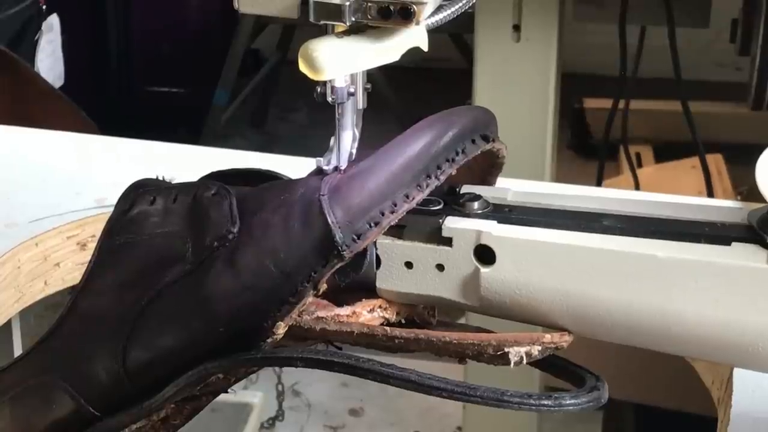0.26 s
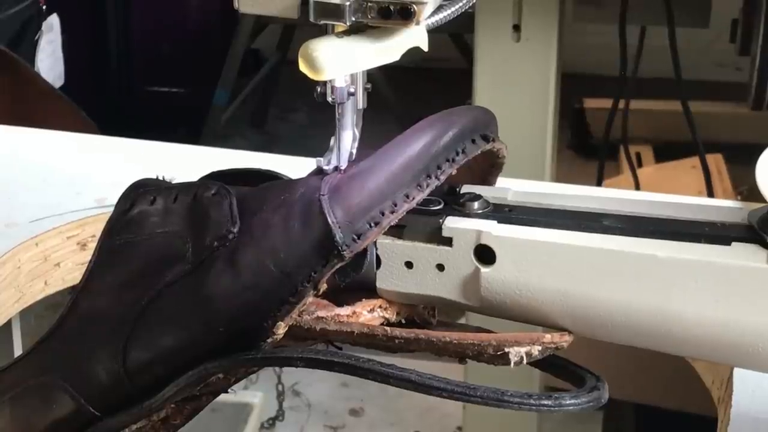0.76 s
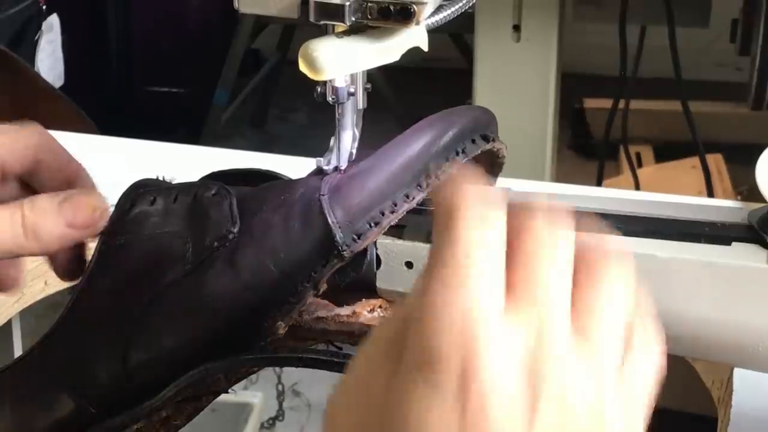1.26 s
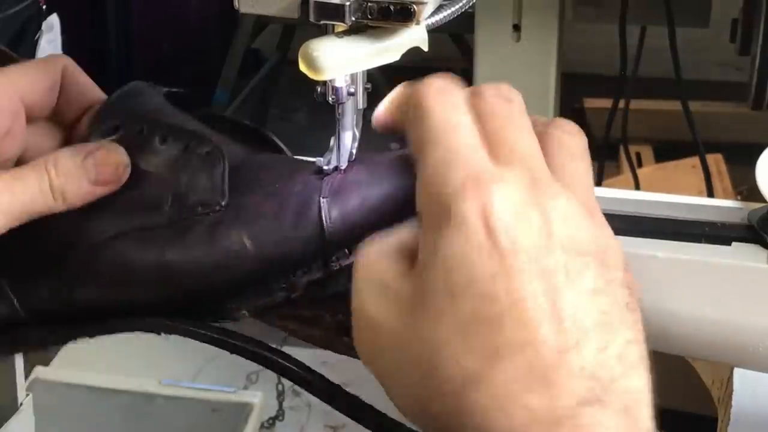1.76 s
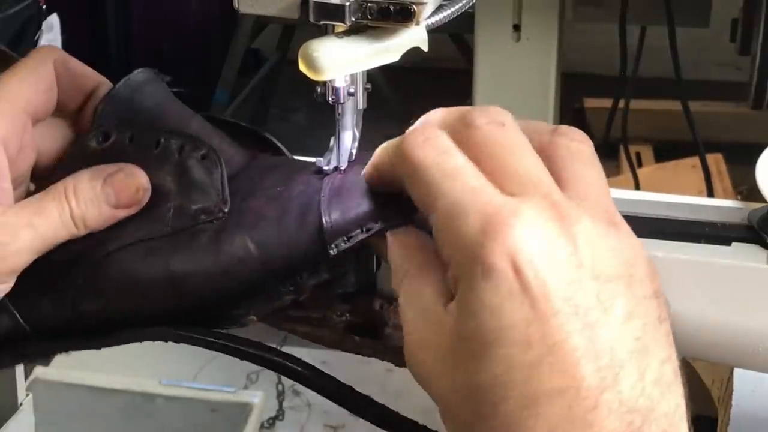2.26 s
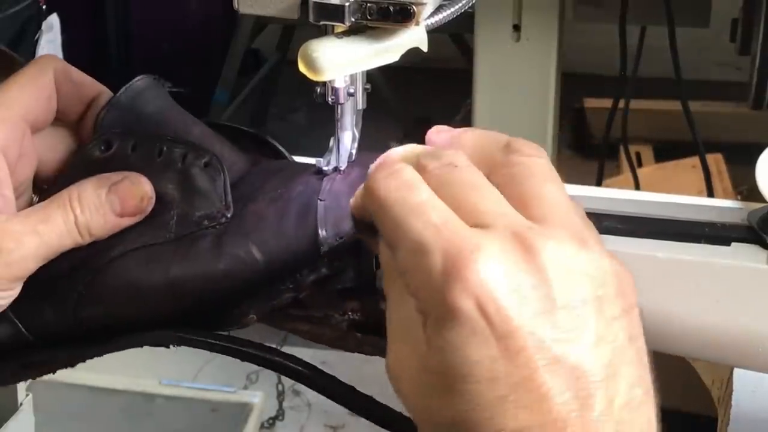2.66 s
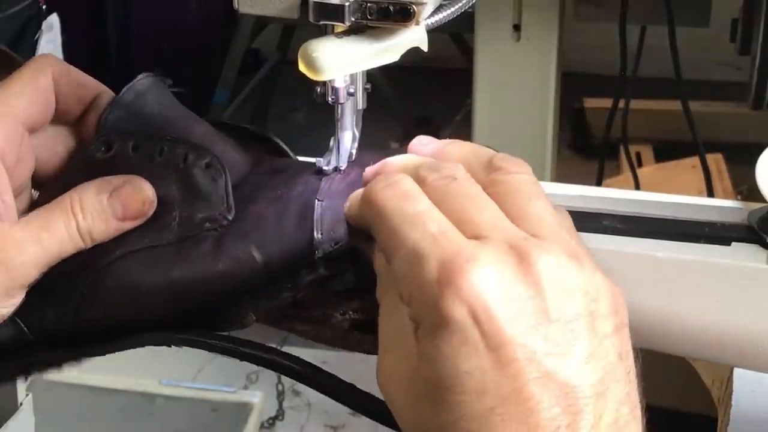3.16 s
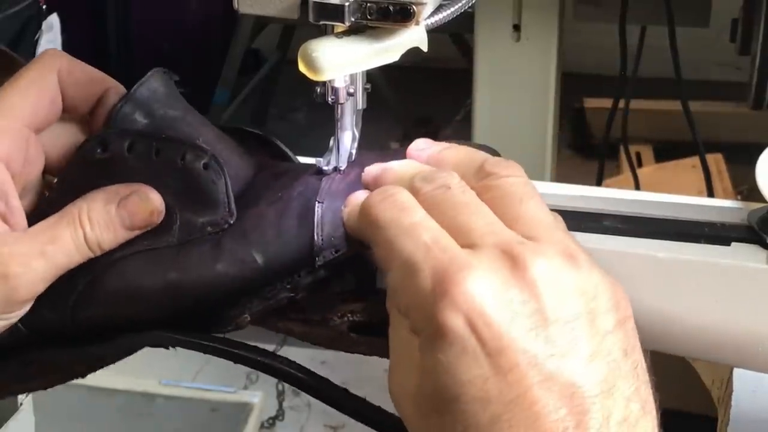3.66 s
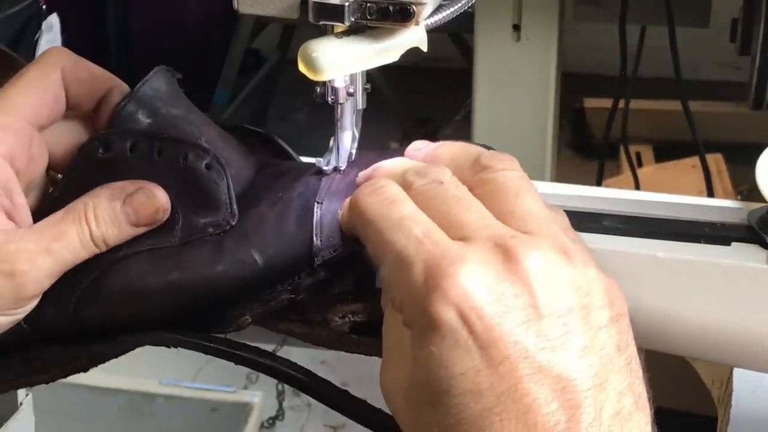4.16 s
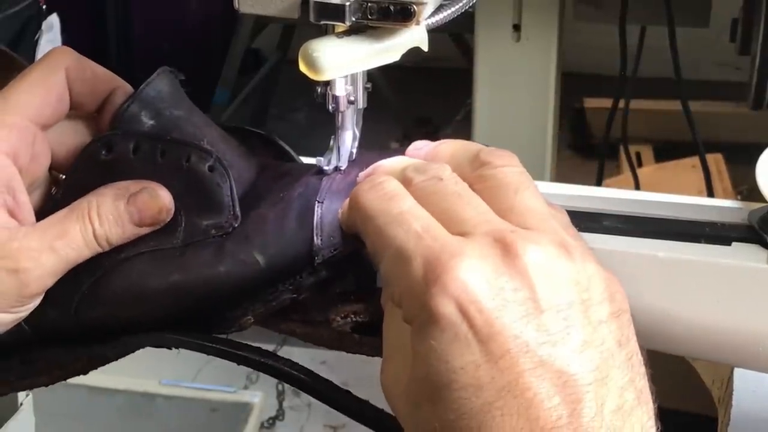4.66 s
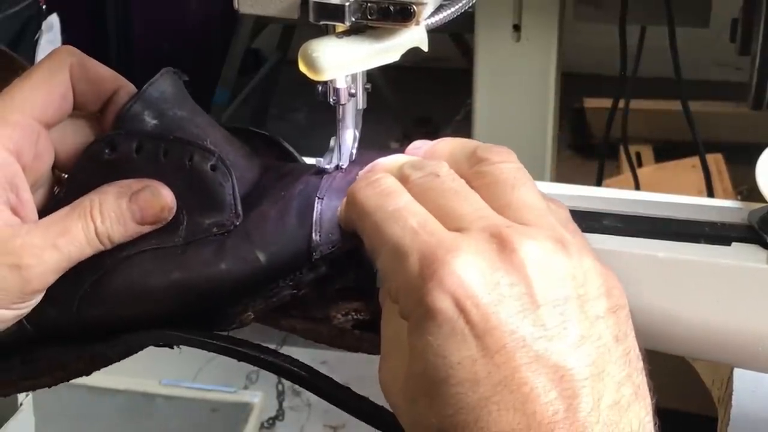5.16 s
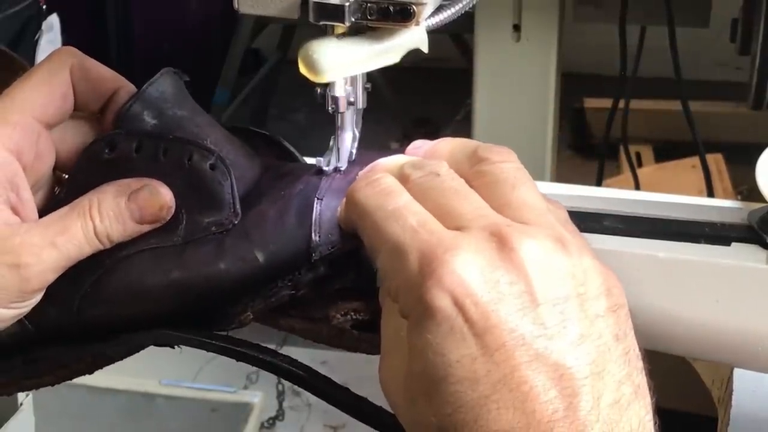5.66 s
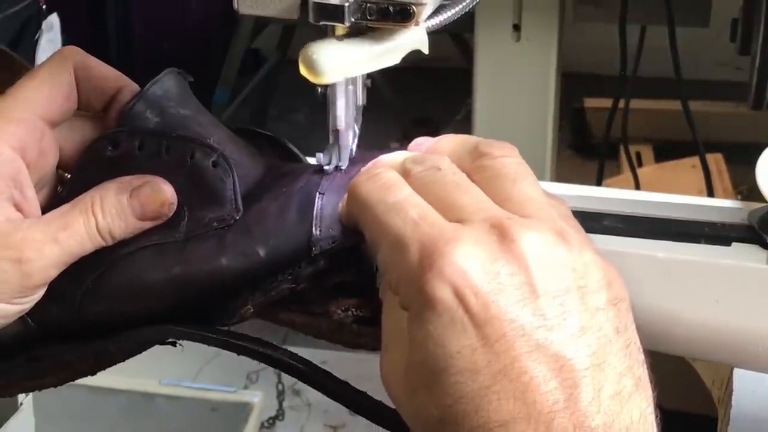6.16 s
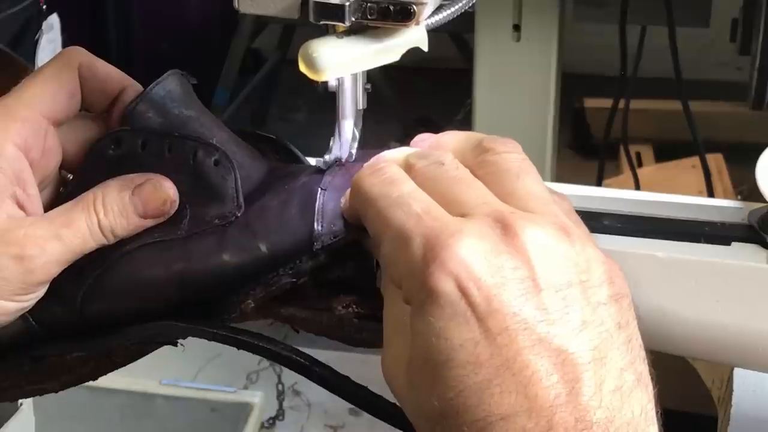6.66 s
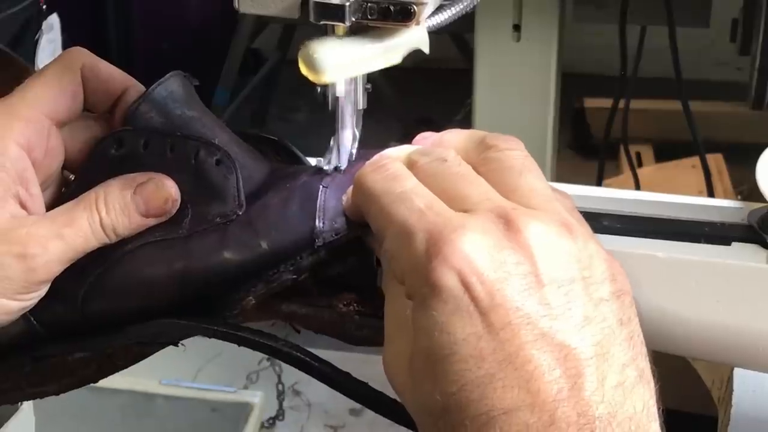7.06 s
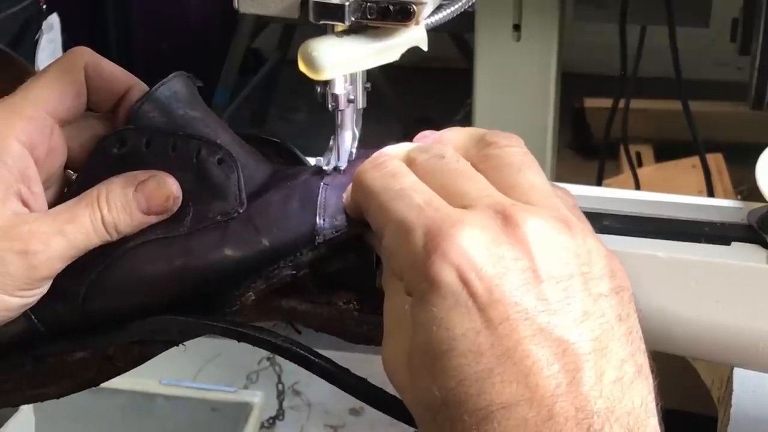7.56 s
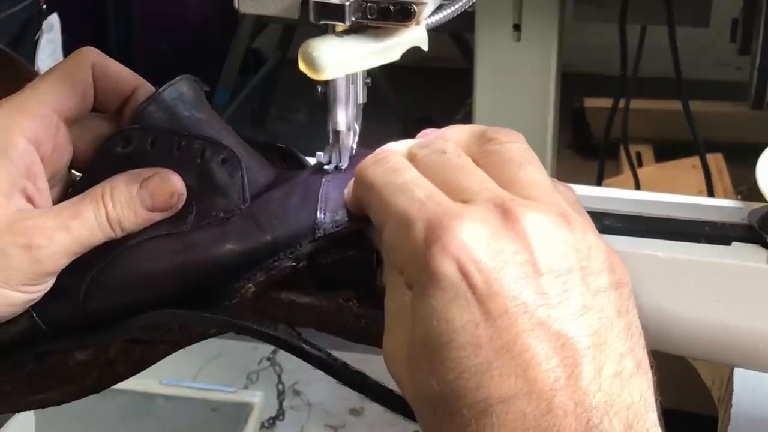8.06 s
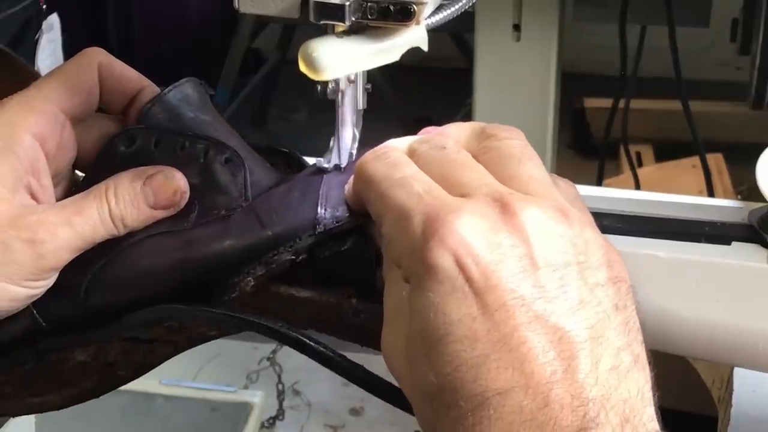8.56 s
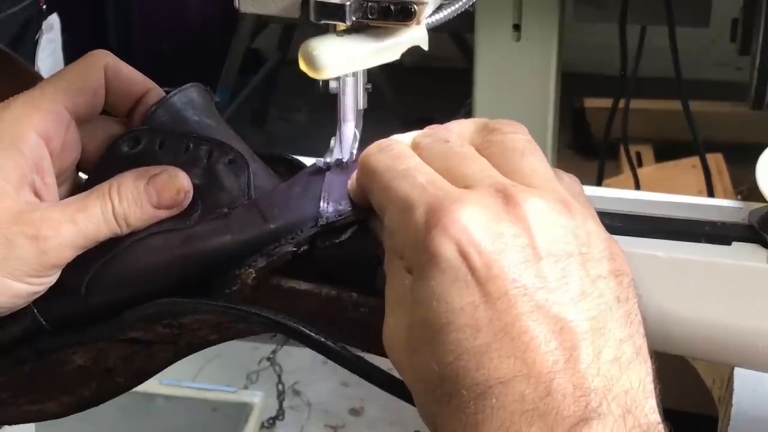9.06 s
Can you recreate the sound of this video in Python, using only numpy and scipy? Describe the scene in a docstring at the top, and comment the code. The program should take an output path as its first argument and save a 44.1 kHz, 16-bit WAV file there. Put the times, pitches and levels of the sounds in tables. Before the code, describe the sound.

Close in a small, fairly dry workshop, a motor hums quietly. A heavy thud on a wooden table opens, followed by leather rustle and a sharp metal snap. Boot and hands knock the steel bed, then settle with small taps and faint pedal sounds. A first stitch clacks, then steady rattling strokes run to the end, with thin high squeals and brief creaks.

```python
"""In a small workshop a clutch motor idles under a leather sewing machine while hands settle a boot on its arm.
Impacts are noise bursts with damped rings: boot, hands and pedal knock, the presser foot drops, then cams, needle
bar and shuttle clack. The slipping clutch squeals on two beating tones, tight thread creaks through the modes of
the iron arm, and the turning shaft rattles as dense ticks while the table drums. Leather rustles as shaped noise,
the motor hums as wavering sines, and sparse reflections answer the impacts, creaks and squeals."""
import sys
import numpy as np
from scipy import signal
from scipy.fft import rfft, irfft
from scipy.io import wavfile
from scipy.ndimage import uniform_filter1d

SR = 44100
rng = np.random.default_rng(int(sys.argv[2]) if len(sys.argv) > 2 else 0)


def unload_wav(signal):
    """Save mono or channel-first audio to the path in sys.argv[1] as 16-bit WAV at rate SR, clipped to [-1, 1]."""
    wavfile.write(
        sys.argv[1],
        SR,
        np.round(np.clip(np.atleast_2d(signal).T, -1, 1) * 32767).astype(np.int16),
    )


N = 410130  # samples

# Levels in the tables are relative where a function or the mix applies a further gain.
# Air of the room. Each row: frequency in Hz, relative spectrum level in dB per Hz.
AIR_SPECTRUM = [(24, -23), (40, 0), (71, -4.5), (207, -16.5), (273, -14), (461, -25.5), (1050, -29),
                (1350, -27.5), (1640, -31), (3740, -38), (4800, -40), (8730, -42), (10400, -48),
                (12700, -42), (15500, -50)]
AIR_DB = -60
# Hum lines of the idling motor. Each row: frequency in Hz, level in dB.
MOTOR_LINES = [(59.2, -57.5), (118.4, -68), (258.4, -77.5), (527.6, -88.5)]
DRONE_HZ, DRONE_DB, DRONE_DRIFT_HZ = 47.6, -65.5, 3  # a low wavering drone; rms drift
# Sleeves and hands sliding over leather. Each row: time in seconds, rustle level in dB, fine hiss level in dB.
RUBBING = [(0, -71.5, -82), (.2, -70, -74), (.375, -69.5, -79), (.4, -64, -75), (.48, -62.5, -70),
           (.57, -67, -73.5), (.63, -72.5, -81.5), (.9, -71, -81), (1.18, -63, -76.5), (1.55, -66.5, -82),
           (1.63, -74, -75.5), (1.8, -74.5, -83), (1.9, -65, -73), (2.1, -64.5, -72), (2.42, -73, -83),
           (3.2, -97, -100)]
# Rustle of leather. Each row: frequency in Hz, relative spectrum level in dB per Hz.
RUSTLE_SPECTRUM = [(710, -1.5), (1200, -3.5), (1750, -3.5), (2130, -3.5), (2680, -2), (3290, -4.5),
                   (4640, -1.5), (8500, -8.5), (11000, -24), (18700, -120)]
# Fine hiss of leather. Each row: frequency in Hz, relative spectrum level in dB per Hz.
HISS_SPECTRUM = [(4410, -34), (7500, -47), (9290, -11.5), (10500, -19.5), (12500, -9.5), (13700, -18),
                 (15100, -12), (15600, -36.5)]

# Dragging of the boot or pedal chain. Each row: top in seconds, hold in seconds, level in dB.
DRAGS = [(3.754, 0.084, -55), (4.263, 0.052, -62)]
# Scrape of the drag. Each row: frequency in Hz, relative spectrum level in dB per Hz.
DRAG_SPECTRUM = [(300, -17), (450, 0), (900, 1.5), (1500, -0.5), (2500, 2), (3900, -6.5), (4600, -27),
                 (9000, -54)]
CATCH, LET_GO = 4500, 280  # rise and fall of a drag, dB per s

# Two contacts of a heavy thud on the wooden table.
# Each row: start in seconds, level in dB, share of the free ring time.
THUDS = [(.1165, -34.5, 0.97), (.1235, -24, 0.46)]
# Modes of the table. Each row: frequency in Hz, relative level in dB, free t60 in seconds.
TABLE_MODES = [(196, -11, 0.22), (274, 11.5, 0.03), (397, 0.5, 0.049), (577, 5.5, 0.032), (860, -20, 0.034)]
# Pressing the pedal sets its rod humming. Each row: start in seconds, level in dB, share of the free ring time.
PEDAL_PRESSES = [(4.104, -54.5, 0.6), (4.268, -50.5, 1), (4.487, -53.5, 0.87), (5.031, -56.5, 0.97),
                 (5.397, -53, 0.73), (7.619, -52.5, 0.47)]
# Modes of the pedal rod. Each row: frequency in Hz, relative level in dB, free t60 in seconds.
ROD_MODES = [(420, -12, 0.51), (534, -3, 0.69)]
# The boot knocks the steel bed. Each row: start in seconds, level in dB, share of the free ring time.
BED_HITS = [(1.1123, -47, 0.8), (1.156, -45.5, 0.63), (1.846, -41.5, 1), (1.8846, -53, 1),
            (1.9599, -44, 0.68), (1.9959, -51, 0.62), (2.0682, -59, 0.71)]
# Modes of the steel bed. Each row: frequency in Hz, relative level in dB, free t60 in seconds.
BED_MODES = [(920, -6, 0.15), (1420, -5.5, 0.49), (1460, -9, 0.22), (1700, -6.5, 0.19), (2310, -18, 0.097),
             (2480, -9, 0.075), (3460, -16, 0.19)]
# A small loose steel part is jolted. Each row: start in seconds, level in dB, share of the free ring time.
PINGS = [(0.126, -50, 0.42), (1.8464, -52, 0.17), (1.9612, -51, 0.15), (4.74, -61, 0.4), (8.6832, -55, 0.4)]
# Modes of that loose part. Each row: frequency in Hz, relative level in dB, free t60 in seconds.
PIN_MODES = [(5600, -2, 0.67), (5720, -4, 0.27), (6130, -5, 0.41)]
# Knocks of boot, hands and pedal. Each row: start in seconds, level in dB, thump in dB relative to it,
# tick in dB relative to it, main ring in Hz, t60 in seconds.
KNOCKS = [(0.0662, -49.5, -3, -16, 1370, 0.056), (0.1182, -26.5, -3, -2, 1664, 0.05),
          (0.392, -52.5, -15, 5, 1520, 0.052), (0.6784, -53.5, -16, -12, 1050, 0.051),
          (1.0005, -38, -35, -18, 1181, 0.27), (1.1095, -49, 7.5, -16, 1610, 0.23),
          (1.1551, -47.5, 6, -22, 940, 0.17), (1.4679, -50.5, 2.5, 5, 920, 0.13),
          (1.4922, -37, -6.5, -7, 1150, 0.12), (1.8469, -45.5, 4.5, -15, 1350, 0.2),
          (1.96, -43.5, 2, -6, 933, 0.21), (1.9976, -52.5, 3.5, -49, 1334, 0.49),
          (2.0681, -37.5, -13, -7, 950, 0.055), (2.15, -39, -9, -11, 1233, 0.12),
          (2.4315, -49.5, -20, -10, 1690, 0.08), (2.6628, -43.5, -22, -13, 2396, 0.16),
          (2.664, -46.5, -13, -19, 815, 0.084), (2.699, -48, -26, -22, 2450, 0.096),
          (2.704, -50.5, -20, -24, 1215, 0.16), (3.2173, -43, -9, -7, 2230, 0.14),
          (3.4826, -60.5, -21, 3, 1240, 0.16), (3.757, -48, -16, -9, 2550, 0.18),
          (4.1036, -47.5, -25, -7, 1142, 0.11), (4.2687, -54.5, 5, -28, 1415, 0.27),
          (4.487, -61.5, 5.5, -20, 1500, 0.22), (5.1434, -50.5, 5.5, -21, 1495, 0.072),
          (5.3983, -54.5, -10, 0, 926, 0.13), (5.4767, -51, -1, -17, 1450, 0.1),
          (7.6183, -46.5, -5, -12, 940, 0.079)]

# Surges of the shaft. Each row: top in seconds, hold in seconds, gear rattle level in dB,
# table drumming in dB relative to the rattle.
SURGES = [(4.114, .01, -57.5, 4.5), (4.313, 0.18, -67, 8), (4.717, .02, -53, 0), (4.971, 0.06, -48, 5),
          (5.352, 0.061, -58, 1), (5.676, .01, -40.5, -2.5), (5.927, 0.011, -39.5, 1),
          (6.192, .05, -42.5, 0.5), (6.393, 0.035, -61.5, -6), (6.493, 0.057, -44.5, 3.5),
          (6.774, 0.0052, -40, 0.5), (7.053, 0.056, -43, 2), (7.297, .13, -46, 2.5), (7.612, .03, -61.5, 5),
          (7.811, .15, -44.5, 2), (8.102, 0.086, -51.5, 5.5), (8.402, 0.066, -43, 4),
          (8.723, 0.089, -46.5, 2.5), (9.03, 0.025, -42, -1.5), (9.265, .03, -57, -2)]
SPIN_UP, RUN_DOWN = 406, 175  # rise and fall of the rattle, dB per s
DRUM_LAG_S, DRUM_UP, DRUM_DOWN = 0.015, 370, 151  # the table follows late: s, dB per s, dB per s
# Rattle of teeth and links. Each row: frequency in Hz, relative spectrum level in dB per Hz.
RATTLE_SPECTRUM = [(350, -16), (600, 11), (844, -15), (1060, 4), (1340, 7), (3480, 2), (5030, -2),
                   (8110, -9.5), (10100, -17), (12700, -8), (15600, -49)]
# Drumming of the table. Each row: frequency in Hz, relative spectrum level in dB per Hz.
DRUMMING_SPECTRUM = [(76, -42), (130, -6.5), (205, -6), (237, 1), (346, -3.5), (424, 4), (837, -22),
                     (900, -5.5), (1170, 0), (1980, -120)]
# Resonances of the stand under the table. Each row: frequency in Hz, width in Hz, relative level in dB.
STAND_MODES = [(182, 16.4, 10), (254, 32, -3.5), (298, 57, 2.5), (417, 32, -5), (528.5, 16, 2.5),
               (608, 180, -5)]

# Creaks as the thread pulls tight. Each row: start in seconds, level in dB, time to half the climb in seconds.
CREAKS = [(5.919, -45.5, .022), (6.163, -42, 0.026), (7.805, -39, 0.027), (8.375, -44, .014),
          (8.993, -40.5, 0.034)]
CREAK_S, CREAK_HZ, CREAK_HOLD_S, CREAK_FADE = 0.085, (1110, 3060), 0.027, 830  # last: dB per s
CREAK_TONE = 1.04  # amplitude of the gliding tone; the rasp noise beside it is evened to rms 1
# Resonances of the iron arm. Each row: frequency in Hz, width in Hz, relative level in dB.
ARM_MODES = [(1090, 22, 9), (1222, 19, 0), (1838, 49, 1), (2384, 24, 10), (2926, 44, 11), (3270, 48, -10)]

# Squeals of the slipping clutch. Each row: top in seconds, hold in seconds, level in dB,
# pitch in Hz above the usual, upper tone in dB relative to the level.
SQUEALS = [(4.417, 0.032, -59.5, 20, 5), (4.64, .016, -43, -150, -23), (4.916, 0.0074, -51.5, 7, 6),
           (5.304, 0.035, -53, 5, -6), (5.579, 0.016, -55, 40, -10), (5.848, 0.055, -57, 12, -6),
           (6.137, .006, -43, -53, -20), (6.422, 0.019, -48, -3, -12), (6.718, .004, -59, -20, -20),
           (6.998, 0.021, -50, -18, -20), (7.262, .018, -50.5, -16, -20), (7.778, .004, -45, -70, -22),
           (8.337, .02, -48.5, -42, -20), (8.662, 0.038, -49, 5, -20), (8.977, .004, -45, -120, -22),
           (9.259, 0.019, -50, 10, -18)]
SQUEAL_HZ, UPPER_HZ = 13120, 13410
GRIP, SLACK, UPPER_SLACK = 3000, 770, 700  # rise, fall and extra fall of the upper tone, dB per s
PULL = 4  # Hz of pitch still missing for each dB of the rise

# Clacks of the machine: the presser foot drops, then cams, needle bar and shuttle clack.
# Each row: start in seconds, level in dB, tick in dB relative to it, main ring in Hz, t60 in seconds.
CLACKS = [(.9737, -39.5, -13, 3490, 0.37), (.9994, -22, -17, 3310, .11), (1.0166, -22.5, -15, 2310, 0.051),
          (4.7049, -34, -20, 4900, 0.041), (4.711, -25.5, -12.5, 4500, 0.02),
          (4.7412, -27.5, -24, 3520, 0.045), (4.9467, -44.5, -12, 2400, 0.069),
          (4.9626, -30.5, -5.5, 3900, .047), (4.9936, -37, -12, 3240, 0.081), (5.0285, -40, -7, 3210, .083),
          (5.0794, -60, -1, 4530, 0.093), (5.353, -40.5, -9, 4090, 0.058), (5.5008, -52, -19, 2060, 0.18),
          (5.5298, -35.5, -17, 3840, 0.032), (5.6174, -31, -15, 4090, 0.054),
          (5.633, -25, -8.5, 4160, 0.048), (5.669, -28, -28, 2200, 0.044), (5.6844, -17, -9, 3800, 0.03),
          (5.7357, -26, -18, 3300, .07), (5.7743, -40, -15, 3930, 0.068), (5.88, -40, -11, 2340, 0.029),
          (5.8965, -26.5, -10, 2500, 0.049), (5.9318, -21.5, -48, 3050, .052),
          (5.9595, -38.5, -7, 3340, 0.057), (5.9904, -34, -8, 3270, 0.056), (6.0435, -43, -14, 2230, 0.098),
          (6.1195, -39, -18, 3170, 0.032), (6.1575, -41, -18, 4600, .042),
          (6.1684, -27.5, -11.5, 2440, 0.11), (6.2032, -20.5, -12, 3680, 0.07),
          (6.2144, -24, -15, 3390, 0.063), (6.2717, -36.5, -7, 2350, 0.095), (6.316, -42.5, -9, 2260, 0.08),
          (6.3664, -44, -11, 3020, 0.11), (6.3915, -34.5, -8, 4000, 0.032), (6.483, -29, -13, 2340, 0.13),
          (6.4886, -26.5, -11, 3360, 0.073), (6.5388, -31, -16, 3300, 0.036),
          (6.572, -27.5, -13.5, 4700, 0.037), (6.7338, -44, -11, 2800, .082),
          (6.7456, -27.5, -15, 2130, 0.071), (6.758, -21.5, -7.5, 5560, 0.058),
          (6.783, -18.5, -14, 3240, 0.065), (6.8153, -36, -31, 4530, .047), (6.8603, -37, -30, 2530, 0.038),
          (6.999, -44.5, -20, 2200, 0.027), (7.0352, -52, -12, 2574, .041),
          (7.0537, -36.5, -0.5, 4780, 0.074), (7.0797, -41, -14, 2010, .036),
          (7.103, -34.5, -8, 3520, 0.11), (7.1137, -22.5, -8.5, 4460, .031),
          (7.1536, -23, -14, 3120, 0.067), (7.214, -31.5, -15, 3930, 0.03),
          (7.2799, -30.5, -6.5, 3870, 0.066), (7.3348, -30.5, -11, 3390, 0.041),
          (7.3541, -25.5, -5.5, 2320, 0.039), (7.3842, -33, -10, 4030, 0.037),
          (7.411, -30, -14, 3450, 0.052), (7.4209, -26, -8.5, 3890, 0.031),
          (7.4758, -27.5, -19, 3650, 0.077), (7.771, -39, -13, 3980, 0.046),
          (7.7824, -27, -10.5, 4000, 0.025), (7.8197, -28.5, -20, 2470, .099),
          (7.8471, -32, -10, 2500, 0.061), (7.8674, -43, 5, 2260, 0.11), (7.9139, -27, -12, 3700, 0.039),
          (7.9274, -16.5, -10.5, 4100, 0.026), (7.9627, -27, -14, 3520, 0.058),
          (8.0308, -35, -18, 3830, 0.02), (8.079, -31, -8.5, 3940, 0.046), (8.1094, -41, -12, 1970, 0.059),
          (8.1489, -31.5, -12.5, 3250, 0.053), (8.1881, -41.5, -9.5, 3680, 0.07),
          (8.33, -44, -12, 2220, 0.044), (8.3372, -31.5, -12, 3780, 0.036),
          (8.3772, -33.5, -15, 3970, 0.22), (8.3938, -21.5, -16, 2460, 0.095),
          (8.4082, -19, -10.5, 2720, 0.06), (8.4235, -16.5, -14, 2930, 0.072),
          (8.4596, -33, -22, 3280, 0.045), (8.4876, -41, -5, 4680, 0.096), (8.5185, -38, -11.5, 2030, 0.12),
          (8.5567, -31.5, -11, 2230, 0.09), (8.5639, -26.5, -18, 4340, 0.03),
          (8.714, -21, -18, 4650, 0.048), (8.7486, -29.5, -10, 2520, 0.052),
          (8.7726, -32.5, -9, 3330, .059), (8.8074, -41.5, -7, 2310, 0.096), (8.856, -41, -12, 2010, 0.051),
          (8.903, -42, -11, 3150, 0.033), (8.961, -39, -16, 3220, 0.051), (8.973, -30.5, -10.5, 3870, 0.12),
          (9.004, -29.5, -40, 2810, 0.14), (9.0242, -18.5, -10.5, 3410, 0.054),
          (9.0717, -36, -9, 2460, 0.073), (9.1109, -39, -5, 2300, 0.05), (9.2623, -35, -22, 4560, 0.018),
          (9.2914, -29, -20.5, 2140, 0.15)]
CLACK_THUMP_DB, USUAL_DB = -13, -33.5  # relative thump of a usual clack; level of a usual clack
THUMP_LAG, SCATTER_DB = 0.34, 5  # share of extra strength that the thump does not follow; rms chance
# Resonances of the machine head. Each row: frequency in Hz, width in Hz, relative level in dB.
HEAD_MODES = [(3440, 190, 3), (3930, 110, 4.5), (4520, 57, 8.5), (5620, 190, -1.5), (6210, 180, 6),
              (6680, 180, 2), (8120, 390, 4), (9060, 110, 2)]

EDGE_HZ = 16000  # upper band limit


def gain_of(db):
    """Decibel law: 20 dB is a factor of ten in amplitude."""
    return 10 ** (np.asarray(db) / 20)


def evened(x):
    """Normalisation to an rms of 1."""
    return x / np.sqrt(np.mean(x ** 2) + 1e-20)


def curve(rows):
    """Linear interpolation of a table's columns at every sample."""
    s, *columns = np.transpose(rows)
    return [np.interp(np.arange(N) / SR, s, c) for c in columns]


def add(mix, s, sound):
    """Superposition of a sound that starts at s seconds."""
    part = mix[round(s * SR):][:len(sound)]
    part += sound[:len(part)]


def swell(t, hold_s, up, down):
    """Exponential growth and decay: dB below the top, rising towards t = 0, held, then falling steadily."""
    return np.minimum(up * t, 0) - down * np.maximum(t - hold_s, 0)


def wander(per_s):
    """Slow random modulation of rms 1: noise averaged twice over 1 / per_s seconds."""
    length = int(SR / per_s)
    return evened(uniform_filter1d(uniform_filter1d(rng.standard_normal(N), length), length))


def coloured(x, points):
    """Spectral shaping: weights x by a table's spectrum, then normalises it."""
    f, db = np.transpose(points)
    hz = np.fft.rfftfreq(len(x), 1 / SR)
    weight_db = np.interp(np.log(hz + 1), np.log(f + 1), db)
    return evened(irfft(rfft(x) * gain_of(weight_db), len(x)))


def band(x, lo_hz, hi_hz):
    """Band-pass filtering between two frequencies."""
    edges = [lo_hz, min(hi_hz, SR / 2.1)]
    return signal.sosfilt(signal.butter(2, edges, "band", fs=SR, output="sos"), x)


def resonate(x, hz, width):
    """Simple resonance: one damped mode with a peak gain near 1."""
    r = np.exp(-np.pi * width / SR)
    return 2 * signal.lfilter([1 - r], [1, -r * np.exp(2j * np.pi * hz / SR)], x).real


def body(x, modes, direct, lift_db):
    """Forced vibration: a solid part lends its resonances to whatever shakes it."""
    return direct * x + sum(gain_of(db + lift_db) * resonate(x, hz, width) for hz, width, db in modes)


def sweep(x, hz, width):
    """Heterodyne filtering: shifts the curve hz down to zero, smooths, and shifts back."""
    turn = np.exp(2j * np.pi * np.cumsum(hz) / SR)
    smooth = signal.butter(2, width / 2, fs=SR, output="sos")
    return (turn * signal.sosfilt(smooth, x / turn)).real


def struck(hits, modes, spread_db, rise_s, rough):
    """Modal free vibration: each hit shares out the same modes anew; loose contact makes them flutter."""
    out, t = np.zeros(N), np.arange(SR // 2) / SR
    hz, mode_db, t60 = np.transpose(modes)[:, :, None]
    for s, db, free in hits:
        share_db = spread_db * rng.standard_normal((len(modes), 1))
        flutter = 1 + rough * evened(uniform_filter1d(rng.standard_normal((len(modes), len(t))), 400))
        decay = gain_of(mode_db + share_db - 60 * t / (free * t60))
        ring = (decay * flutter * np.sin(2 * np.pi * hz * t)).sum(0)
        add(out, s, gain_of(db) * ring * (1 - np.exp(-t / rise_s)))
    return out


def blows(rows, below, above, thump_hz, tick_hz, thump_db, tick_db, ring_db, rise_s, snap):
    """Impact: a short noise crack around a damped ring, a slower thump in the table and a quick tick."""
    out, t = np.zeros(N), np.arange(SR // 7) / SR
    contact = 1 + snap * np.exp(-t / 0.0002)  # the first touch is sharper than the rest
    for s, db, low_db, high_db, hz, t60 in rows:
        crack_noise, thump_noise, tick_noise = rng.standard_normal((3, len(t)))
        crack = evened(band(crack_noise, below * hz, above * hz))
        thump = gain_of(low_db + thump_db) * evened(band(thump_noise, 134, thump_hz))
        thump = thump * (1 - np.exp(-t / 0.0041))
        tick = gain_of(high_db + tick_db) * evened(band(tick_noise, tick_hz, SR))
        partner_hz = hz * rng.uniform(0.92, 1.05)
        pair = np.sin(2 * np.pi * hz * t) + 1.4 * np.sin(2 * np.pi * partner_hz * t)
        # Blunt blows, with little tick, ring the most and build up more slowly.
        ring = gain_of(ring_db - 0.19 * high_db) * pair * (1 - np.exp(-t / 0.0014))
        rise = 1 - np.exp(-t / (rise_s * gain_of(-0.6 * high_db)))
        # The tick dies faster and the thump slower than the row's t60.
        sound = (contact * crack + ring) * gain_of(-60 * t / t60)
        sound = sound + contact * tick * gain_of(-80 * t / t60) + thump * gain_of(-40 * t / t60)
        add(out, s, gain_of(db) * sound * rise)
    return out


def workshop():
    """Stationary broadband noise: the air of the room, its level wandering slightly."""
    return gain_of(AIR_DB + 1.5 * wander(5.7)) * coloured(rng.standard_normal(N), AIR_SPECTRUM)


def motor():
    """Line spectrum: hum tones with weak amplitude and phase modulation, and a frequency-modulated drone."""
    t = np.arange(N) / SR
    hum = np.zeros(N)
    for hz, db in MOTOR_LINES:
        hum += gain_of(db + 1.2 * wander(4)) * np.sin(2 * np.pi * hz * t + 0.28 * wander(2.3))
    drone_hz = DRONE_HZ + DRONE_DRIFT_HZ * wander(1.484)
    drone_phase = 2 * np.pi * np.cumsum(drone_hz) / SR + 2.0 * wander(2.65)
    drone = gain_of(DRONE_DB + 3.6 * wander(6.7)) * np.sin(drone_phase)
    return np.sqrt(2) * (hum + drone)  # levels are rms


def rubbing():
    """Friction noise: a soft rustle and a finer hiss share a slightly grainy level."""
    rustle_db, hiss_db = curve(RUBBING)
    rustle = gain_of(rustle_db + 1.0) * coloured(rng.standard_normal(N), RUSTLE_SPECTRUM)
    hiss = gain_of(hiss_db + 5.0) * coloured(rng.standard_normal(N), HISS_SPECTRUM)
    t = np.arange(N) / SR
    return gain_of(1.1 * wander(59)) * (rustle + hiss) * (t < RUBBING[-1][0])


def dragging():
    """Stick-slip friction: quick uneven slips make a grainy scrape."""
    out, t = np.zeros(N), np.arange(-0.02, 0.25, 1 / SR)
    for s, hold, db in DRAGS:
        strong = rng.random(len(t)) < 1200 / SR  # 1200 strong slips per s on average
        slips = rng.standard_normal(len(t)) * (0.27 + strong * 1.8)
        scrape = coloured(slips, DRAG_SPECTRUM)
        add(out, s + t[0], gain_of(db + swell(t, hold, CATCH, LET_GO)) * scrape)
    return out


def table_thuds():
    """Damped plate modes: a heavy thud rings the wooden table briefly."""
    return struck(THUDS, TABLE_MODES, spread_db=0.5, rise_s=0.0018, rough=0.1)


def pedal_rod():
    """Free vibration of a rod: pressing the pedal leaves two fluttering tones."""
    return struck(PEDAL_PRESSES, ROD_MODES, spread_db=1.3, rise_s=0.0096, rough=0.93)


def steel_bed():
    """Modal ringing of a steel bed knocked by the boot."""
    return struck(BED_HITS, BED_MODES, spread_db=1.5, rise_s=0.003, rough=0.7)


def loose_part():
    """Modal ringing of a small steel part: its few high modes ping."""
    return struck(PINGS, PIN_MODES, spread_db=1.5, rise_s=0.003, rough=0.5)


def knocks():
    """Blunt impacts: boot, hands and pedal excite low rings and a thump."""
    return blows(KNOCKS, 0.38, 1.51, 1530, 2800, thump_db=3.0, tick_db=-5.0, ring_db=-6.5,
                 rise_s=0.00061, snap=0.4)


def shaft_turning():
    """Dense random impacts: loose teeth and links tick while the shaft turns, and the table drums along."""
    coarse_t = np.arange(0, N, 64) / SR
    spin, shake = np.zeros((2, len(coarse_t)))
    for s, hold, db, drum_db in SURGES:
        spin += gain_of(db + swell(coarse_t - s, hold, SPIN_UP, RUN_DOWN))
        shake += gain_of(db + drum_db + swell(coarse_t - s - DRUM_LAG_S, hold, DRUM_UP, DRUM_DOWN))
    spin, shake = (np.interp(np.arange(N) / SR, coarse_t, v) for v in (spin, shake))
    strength = gain_of(2.3 * np.minimum(rng.exponential(1, N), 5))
    ticks = strength * (rng.random(N) < 1500 / SR)  # 1500 ticks per s on average
    decay = gain_of(-60 * np.arange(2000) / SR / 0.014)
    envelope = np.sqrt(signal.oaconvolve(ticks ** 2, decay ** 2)[:N] + 1e-9)  # tick energies add
    rattle = coloured(envelope * rng.standard_normal(N), RATTLE_SPECTRUM)
    rumble = coloured(rng.standard_normal(N), DRUMMING_SPECTRUM)
    drumming = evened(body(rumble, STAND_MODES, 0.28, lift_db=-4.0))
    return gain_of(-5.0) * spin * rattle + gain_of(-6.5) * shake * drumming


def thread_creaks():
    """Swept excitation: a rasp that climbs in pitch wakes the modes of the arm one after another."""
    out, t = np.zeros(N), np.arange(0, CREAK_S, 1 / SR)
    for s, db, half_s in CREAKS:
        u = (t / half_s) ** 3
        hz = CREAK_HZ[0] + (CREAK_HZ[1] - CREAK_HZ[0]) * u / (1 + u)
        rasp = evened(sweep(rng.standard_normal(len(t)), hz, width=500))
        rasp = rasp + CREAK_TONE * np.sin(2 * np.pi * np.cumsum(hz) / SR)
        level = gain_of(db + swell(t, CREAK_HOLD_S, 0, CREAK_FADE))
        rasp = level * rasp * signal.windows.tukey(len(t), 0.1)
        rasp = np.pad(rasp, (0, SR // 8))  # room for the arm to ring on
        add(out, s, body(rasp, ARM_MODES, 0.12, lift_db=4.0))
    return out


def clutch_squeals():
    """Beating: the slipping clutch sings on two close fuzzy tones, with a briefer upper tone."""
    out, t = np.zeros(N), np.arange(-0.03, 0.12, 1 / SR)
    for s, hold, db, above_hz, upper_db in SQUEALS:
        pitch = SQUEAL_HZ + above_hz + PULL * swell(t, hold, GRIP, 0)
        turns = np.cumsum(pitch) / SR
        beat = 1 + 0.81 * np.exp(2j * np.pi * (70 * t + rng.random()))  # second tone 70 Hz higher
        fuzz, fuzz_up = uniform_filter1d(rng.standard_normal((2, len(t), 2)), 150, 1) @ [1, 1j]
        tone = evened(((beat + 2.7 * fuzz) * np.exp(2j * np.pi * turns)).real)
        upper = evened(((1 + 4 * fuzz_up) * np.exp(2j * np.pi * UPPER_HZ * t)).real)
        upper = gain_of(upper_db + swell(t, hold, 0, UPPER_SLACK)) * upper
        add(out, s + t[0], gain_of(db + swell(t, hold, GRIP, SLACK)) * (tone + upper))
    return out


def voiced(rows):
    """Nonlinear impact: harder clacks gain mostly crack and ring; the table thump lags behind and scatters."""
    s, db, tick_db, hz, t60 = np.transpose(rows)
    thump_db = CLACK_THUMP_DB - THUMP_LAG * (db - USUAL_DB) + SCATTER_DB * rng.standard_normal(len(s))
    return zip(s, db, thump_db, tick_db, hz, t60)


def machine_clacks():
    """Hard impacts through a resonant body: presser foot, then cams, needle bar and shuttle shake the head."""
    clacks = blows(voiced(CLACKS), 0.44, 1.605, 3500, 2900, thump_db=12.0, tick_db=13.5, ring_db=-7,
                   rise_s=0.00017, snap=0.48)
    return body(clacks, HEAD_MODES, 0.69, lift_db=-6.0)


def room(x):
    """Reverberation: sparse reflections whose treble dies sooner than the bass."""
    t = np.arange(SR // 2) / SR
    taps = rng.choice([-1., 1.], len(t)) * (rng.random(len(t)) < 0.1) * (t > 0.004)
    tail = band(taps, 67, 4140) * gain_of(-60 * t / 0.17)
    tail = tail + band(taps, 3270, 10900) * gain_of(-60 * t / 0.15)
    return signal.oaconvolve(x, tail / np.linalg.norm(tail))[:N]


def scene():
    """Superposition: background, shaft and near sources, with reflections of the near sources only."""
    background = workshop() + motor() + rubbing()
    near = dragging() + table_thuds() + pedal_rod() + steel_bed() + loose_part()
    near = near + gain_of(-6) * knocks() + thread_creaks() + clutch_squeals()
    near = near + gain_of(-11.0) * machine_clacks()
    return (background + shaft_turning() + near + gain_of(-9.5) * room(near))[None]


def record(dry):
    """Band limitation: the small microphone loses the deepest bass, then a low-pass cuts the top."""
    thin = signal.sosfilt(signal.butter(3, 27, "high", fs=SR, output="sos"), dry)
    low_pass = signal.firwin(511, EDGE_HZ, window=("kaiser", 9), fs=SR)
    return signal.oaconvolve(thin, low_pass[None], "same")


dry = scene()
out = record(dry)
unload_wav(out)
```